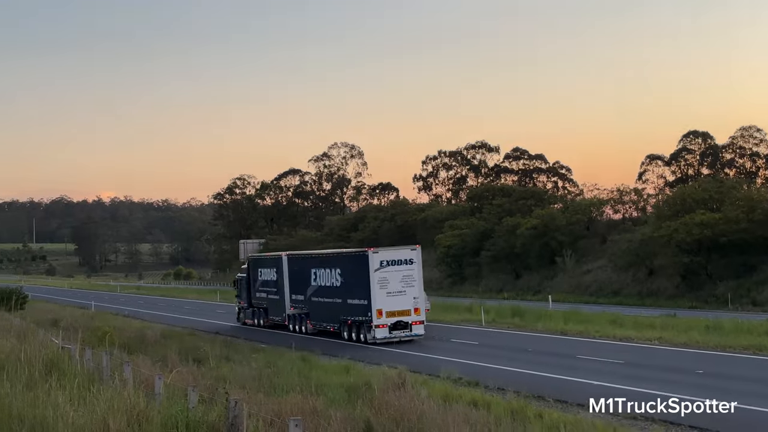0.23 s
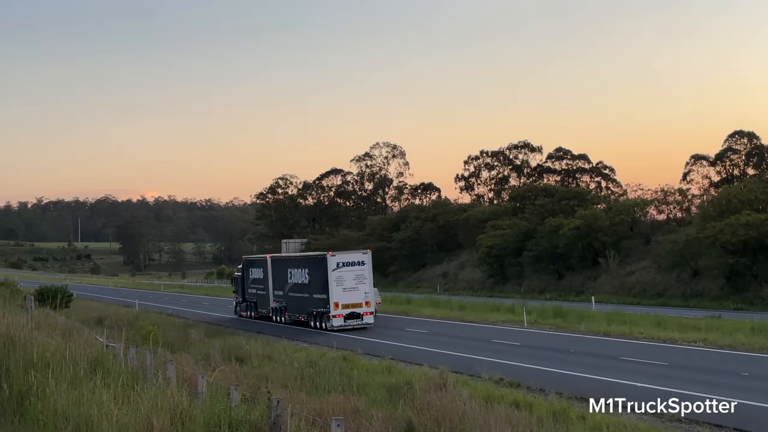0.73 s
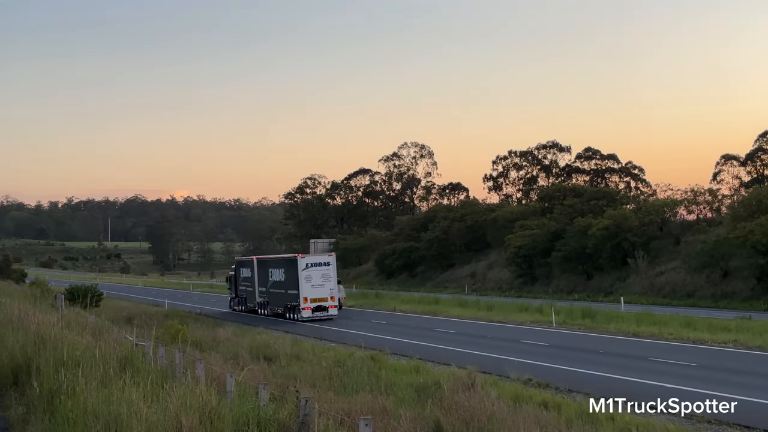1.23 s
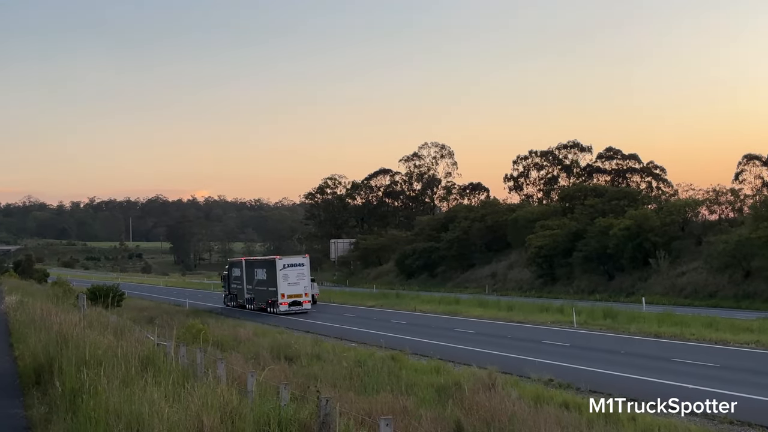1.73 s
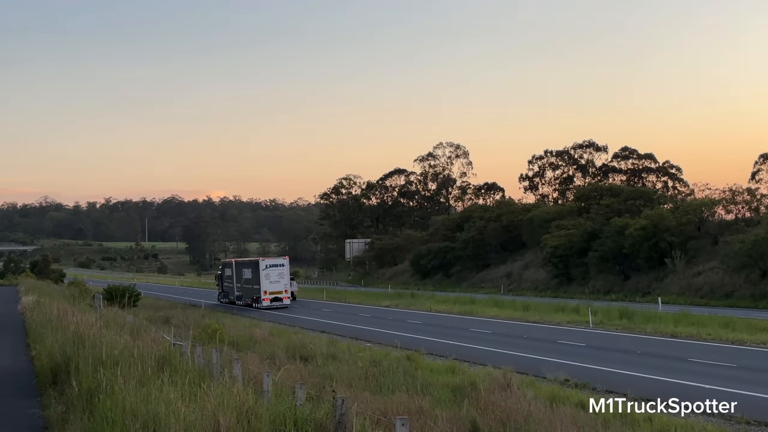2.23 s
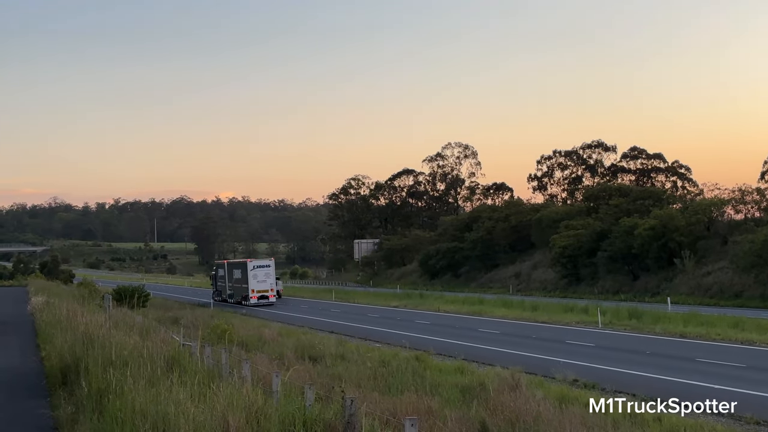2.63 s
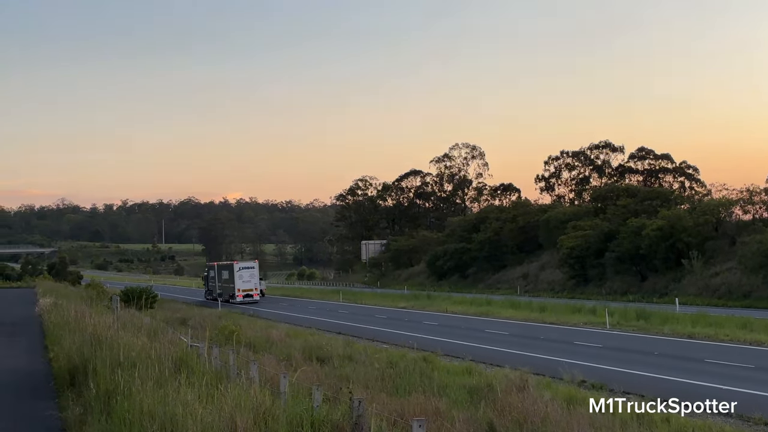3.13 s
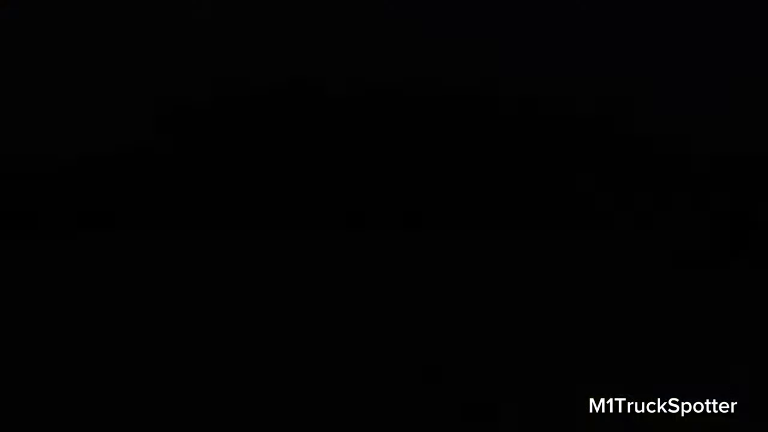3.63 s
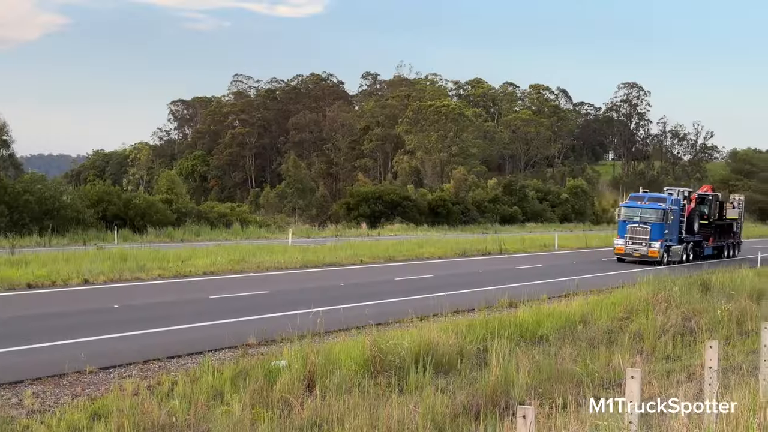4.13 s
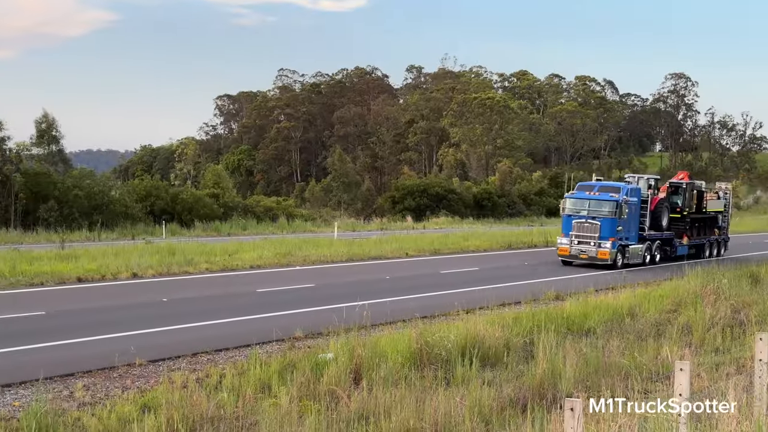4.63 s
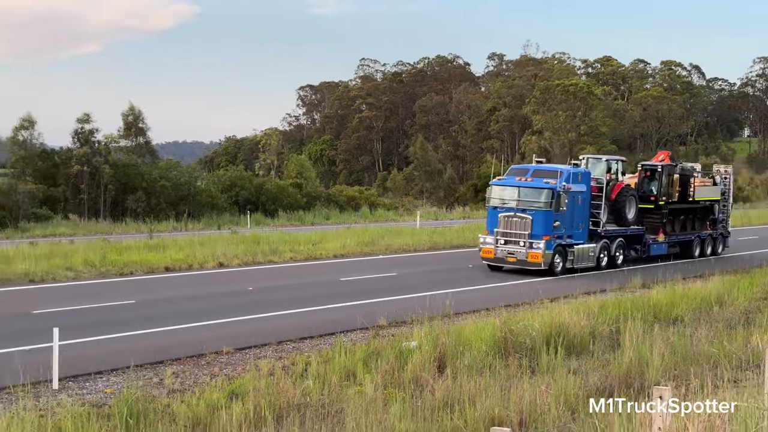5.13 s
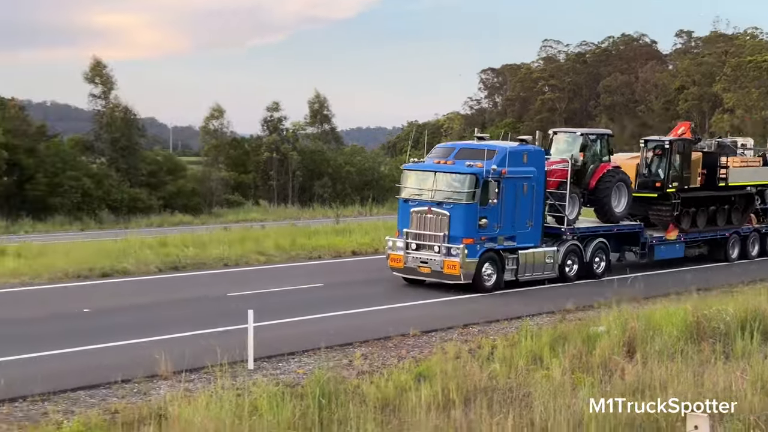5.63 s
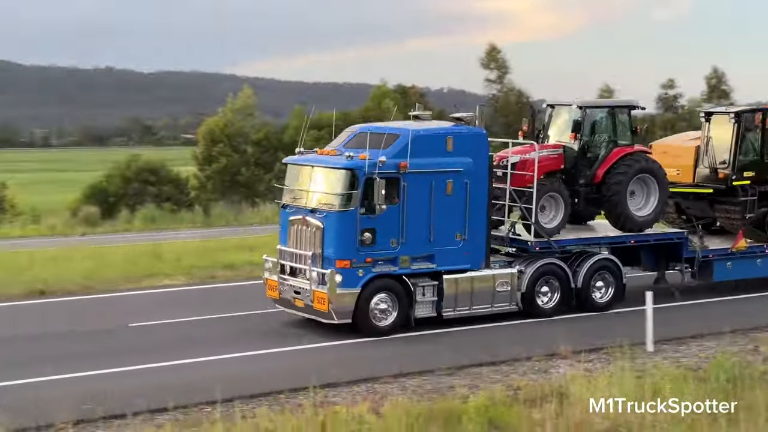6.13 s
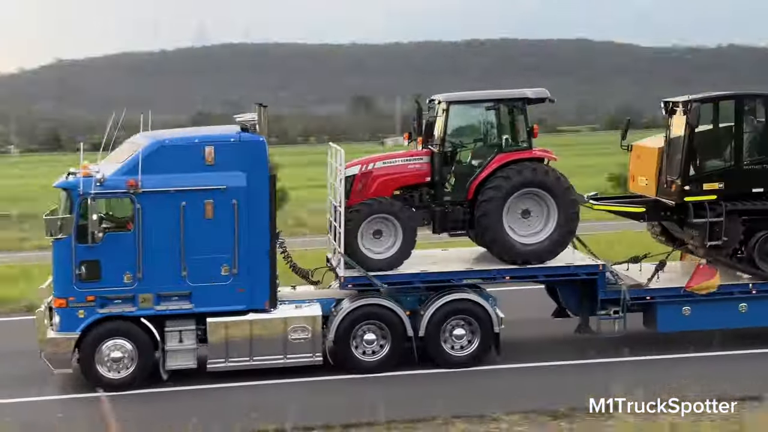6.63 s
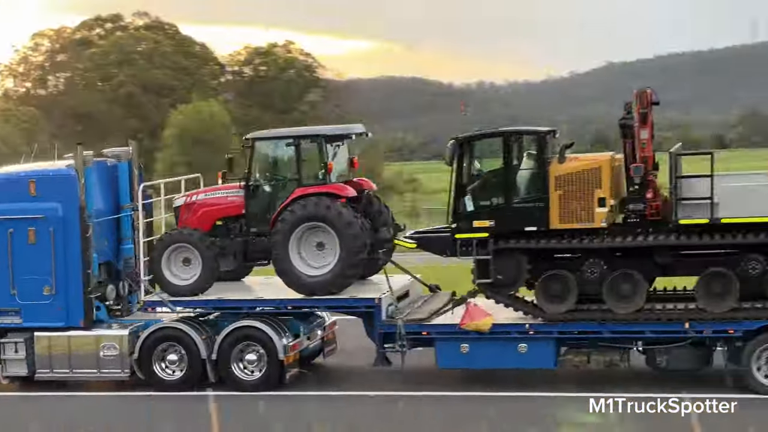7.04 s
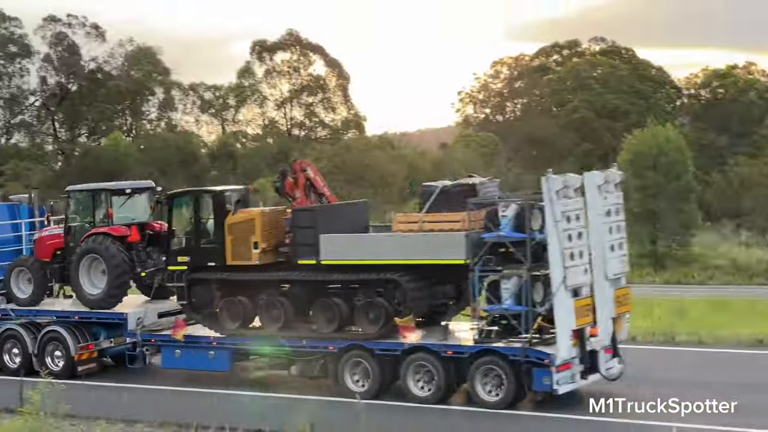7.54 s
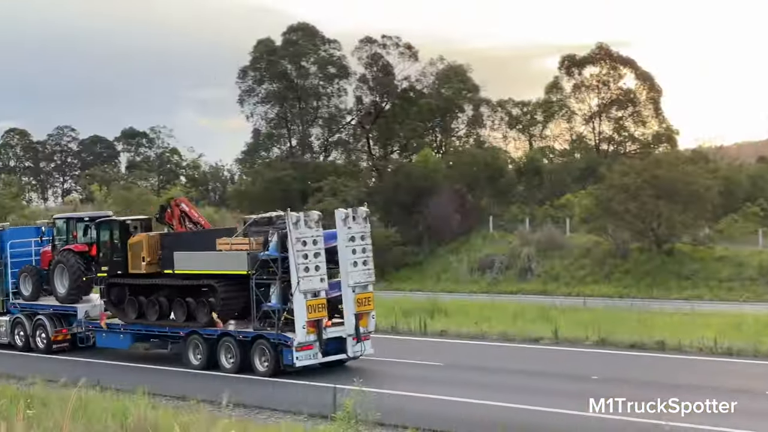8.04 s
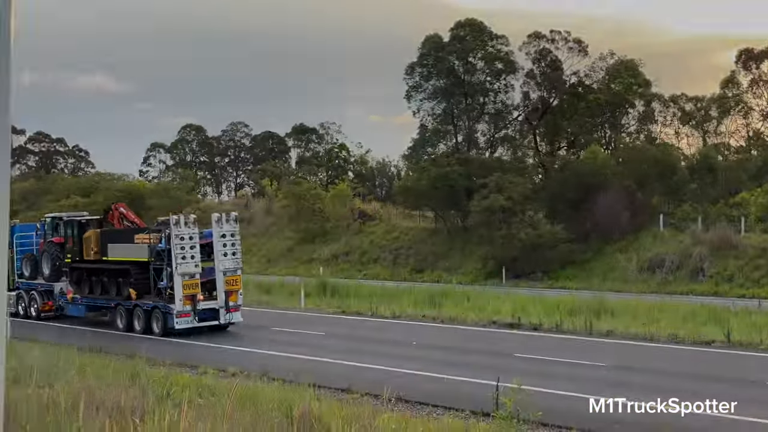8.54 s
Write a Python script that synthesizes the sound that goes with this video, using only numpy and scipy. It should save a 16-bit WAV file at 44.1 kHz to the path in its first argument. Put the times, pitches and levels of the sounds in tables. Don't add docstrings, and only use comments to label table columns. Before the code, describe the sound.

Receding muffled truck roar with faint insects, an abrupt double click, then a loud low diesel engine and singing tyres sweep past, chains rattling.

```python
import sys
import numpy as np
from scipy import signal
from scipy.fft import rfft, irfft, next_fast_len
from scipy.io import wavfile
from scipy.ndimage import uniform_filter1d, map_coordinates

SR = 44100
rng = np.random.default_rng(int(sys.argv[2]) if len(sys.argv) > 2 else 0)


def voltage_ratio(level):
    return 10 ** (np.asarray(level, float) / 20)


def persist_wave(psi):
    counts = np.round(np.clip(psi, -1, 1) * 32767).astype(np.int16)
    wavfile.write(sys.argv[1], SR, np.atleast_2d(counts).T)


N = 387330
CUT_S = 3.6627


def seconds():
    return np.arange(N) / SR


def unit(x):
    return x / np.sqrt(np.mean(x ** 2) + 1e-20)


def along(points, hz):
    f, v = np.transpose(points)
    return np.interp(np.log(hz + 1), np.log(f + 1), v)


def curves(rows):
    s, *columns = np.transpose(rows)
    return [np.interp(seconds(), s, column) for column in columns]


def bump(s, lasts):
    return np.exp(-.5 * ((seconds() - s) / lasts) ** 2)


def wobble(rate):
    knots = rng.standard_normal(int(N * rate / SR) + 4)
    return map_coordinates(knots, [np.arange(N) * rate / SR])


def filtered(x, response):
    m = next_fast_len(N + SR // 2)
    return irfft(rfft(x, m) * response(np.fft.rfftfreq(m, 1 / SR)), m)[..., :N]


def coloured(colour):
    return unit(filtered(rng.standard_normal(N), lambda f: voltage_ratio(along(colour, f))))


def narrow(hz, width):
    return unit(filtered(rng.standard_normal(N), lambda f: np.exp(-((f - hz) / width) ** 2)))


def swells(rows):
    return sum(voltage_ratio(db) * bump(s, lasts) * narrow(hz, width) for s, hz, width, db, lasts in rows)


def tone(hz, blur, flutter_db, free=1):
    turn = 2 * np.pi * (np.cumsum(hz) / SR + free * rng.random())
    level = np.sqrt(2) * voltage_ratio(flutter_db * wobble(9))
    return level * np.sin(turn + blur * wobble(12))


def crank(lag):
    true_hz, mach = 25.116, .0787
    abreast_s, reach_s = 6.767, .733
    u = (seconds() - lag - abreast_s) / reach_s
    return true_hz / (1 + mach * u / np.sqrt(1 + u * u))


def passing(hz, beam, echo, screened=0):
    db, behind_db, power = beam
    strength, detour, s, reach = echo
    u = (seconds() - s) / reach
    far = np.sqrt(1 + u * u)
    strength = np.clip(strength * (1 - screened * u / far), 0, 1)
    bounce = strength * np.exp(2j * np.pi * hz * detour / far / 343)
    return voltage_ratio(db + behind_db * u / far) * far ** -power * np.abs(1 + bounce)


EXHAUST = (3, 5, 6, 8, 9, 11)
# level abreast in dB, gain behind in dB, falloff power.
EXHAUST_BEAM = [(-12.5, -2.5, 0.95), (-24, -5.5, 0.82), (-27.5, -15, 0.62), (-19.5, -4.5, 4),
                (-25.5, -2.7, 2), (-26, -8.5, 2.46)]
# strength 0-1, detour abreast in m, nearest in seconds, reach in seconds.
EXHAUST_ECHO = [(0.79, 2.52, 6.79, 0.49), (0.75, 1.57, 6.45, 0.64), (1, 3.41, 7.31, 0.58),
                (0.82, 1.28, 6.83, 1.09), (0.67, 2.16, 6.49, 0.74), (0.86, 3.24, 6.82, 0.985)]
BLOCK_ORDERS = (12, 13, 14, 16, 19)
BLOCK_AIM = [(-35, -11.5, 2.5), (-34, -4, 1.9), (-28, -4, 2.6), (-40, -4.5, .7), (-35, -4.5, 1.35)]
BLOCK_BOUNCE = [(.85, 1.91, 6.91, 1.43), (.43, 2.67, 6.84, 1.32), (.88, .5, 6.72, .97),
                (.59, 2.3, 6.96, 1.27), (.46, 1.9, 6.37, .95)]
# multiple of the crank speed, level in dB. They share one aim and echo.
WEAK_ORDERS = [(2, -24), (4, 2.5), (7, -13), (8.5, -1.5), (10.5, -10), (15, -27), (18, -0.5)]
WEAK_AIM = (-43.5, -5.5, 1.37)
WEAK_BOUNCE = (0.31, 0.35, 6.1, 1.12)
# time in seconds, pitch in Hz, level in dB.
TURBO_WHINE = [(4, 10650, -88), (4.3, 10620, -77), (5, 10500, -71), (5.7, 10270, -68), (6.3, 9800, -67),
               (6.7, 9500, -100)]


def engine():
    hz = crank(0)
    out = 0
    for k, beam, echo in zip(EXHAUST, EXHAUST_BEAM, EXHAUST_ECHO):
        out += passing(k * hz, beam, echo, screened=0.31) * tone(k * hz, blur=.04, flutter_db=.3, free=0)
    for k, beam, echo in zip(BLOCK_ORDERS, BLOCK_AIM, BLOCK_BOUNCE):
        out += passing(k * hz, beam, echo) * tone(k * hz, blur=.1, flutter_db=1, free=0)
    weak = sum(voltage_ratio(db) * tone(k * hz, blur=.1, flutter_db=1, free=0) for k, db in WEAK_ORDERS)
    turbo_hz, turbo_db = curves(TURBO_WHINE)
    whine = voltage_ratio(turbo_db) * tone(turbo_hz, blur=2, flutter_db=5)
    return out + passing(12 * hz, WEAK_AIM, WEAK_BOUNCE) * weak + whine


# tractor level in dB, tractor nearest in seconds, trailer level in dB, falloff power.
ROAD_LAYERS = [(-21.5, 6.35, -45, 1.26), (-26.5, 6.03, -30.5, 1.82), (-38, 5.94, -42, 1.45),
               (-47, 6.4, -51, 2.03)]


def near_levels():
    trailer_s, reach_s = 7.33, .85

    def heard(db, s, power):
        return voltage_ratio(2 * db) * (1 + ((seconds() - s) / reach_s) ** 2) ** -power

    return [10 * np.log10(heard(tractor_db, s, power) + heard(trailer_db, trailer_s, power))
            for tractor_db, s, trailer_db, power in ROAD_LAYERS]


HANDOVER_HZ = [290, 2820, 6500], [837, 2850, 7450]


def road(levels, colours, place, split_hz, patchy_db):
    spectrum = signal.stft(rng.standard_normal(N), nperseg=512)[2]
    field = uniform_filter1d(rng.standard_normal(spectrum.shape), 4, 0)
    field = uniform_filter1d(field, 10, 1)
    noise = signal.istft(spectrum * voltage_ratio(patchy_db * unit(field)), nperseg=512)[1][:N]
    edges = [1, *split_hz, SR]
    out = 0
    for db, lo, hi in zip(levels, edges, edges[1:]):
        def share(f):
            return np.sqrt(1 / (1 + (f / hi) ** 6) - 1 / (1 + (f / lo) ** 6))

        for k, colour in enumerate(colours):
            weight = np.clip(1 - np.abs(place - k), 0, 1)
            layer = unit(filtered(noise, lambda f: share(f) * voltage_ratio(along(colour, f))))
            out = out + weight * voltage_ratio(db) * layer
    return out


# time in seconds, pitch in Hz, level in dB, length in seconds.
AXLE_SONGS = [(6.32, 568, -29, .13), (6.67, 582, -28.5, .13), (7.47, 875, -36, .13), (6.7, 835, -36, .07),
              (5.25, 616, -28, .17), (5.28, 573, -34, .15), (5.25, 899, -39, .25), (5.3, 990, -40, .22),
              (7.2, 446, -33, .14), (7.95, 538, -39, .3), (7.05, 555, -32, .15), (4.05, 617, -44, .3),
              (6.55, 476, -32, .13)]


def axles():
    hz = crank(.3)
    out = 0
    for s, pitch, db, lasts in AXLE_SONGS:
        glide = pitch * hz / np.interp(s, seconds(), hz)
        out += voltage_ratio(db) * bump(s, lasts) * tone(glide, blur=.6, flutter_db=2)
    return out


# multiple of the crank speed, lag behind the exhaust in seconds.
TREADS = [(18.24, .1), (36.48, .1), (54.72, .08), (22.68, .1), (33.18, -.05), (21.2, .2)]
# level abreast in dB, gain behind in dB, falloff power.
TREAD_AIM = [(-34, 9.5, 1.08), (-36, 0.5, 1.4), (-43.5, 2, 1.7), (-30.5, -2, 0.7), (-34, 1.5, 1.9),
             (-31, 3, 1.15)]
# strength 0-1, detour abreast in m, nearest in seconds, reach in seconds.
TREAD_BOUNCE = [(0.44, 1.48, 5.55, 0.71), (0.35, 1.285, 6.54, 0.73), (0.27, 0.67, 6.74, 1.45),
                (0.63, 1.374, 6.37, 0.52), (0.82, 1.04, 5.95, 0.74), (0.56, 0.83, 5.97, 0.36)]
# frequency in Hz, dB per Hz.
ROAR_COMING = [(40, -23), (100, 0.5), (190, 0), (250, -3), (330, -5.5), (480, -3.5), (750, -13.5),
               (1000, -11.5), (1850, -23), (2300, -26.5), (3600, -35.5), (4200, -40.5), (7500, -46.5),
               (15500, -56)]
ROAR_ABREAST = [(40, -17), (100, 0), (180, 4), (260, 4), (380, -4.5), (550, -1.5), (900, -9.5),
                (1400, -10.5), (2200, -19), (3300, -26), (5000, -30), (8000, -34.5), (12000, -40),
                (15500, -43)]
ROAR_LEAVING = [(40, -25), (100, 2.5), (170, -3), (250, -13.5), (350, -5.5), (550, -6), (900, -9.5),
                (1300, -8.5), (2000, -14.5), (3000, -21.5), (5000, -21.5), (8000, -28), (12000, -35.5),
                (15500, -37)]
# time in seconds, place (0 coming, 1 abreast, 2 leaving).
PASS_PLACE = [(4.6, 0), (6, 1), (7.3, 1), (8, 2)]


def tyres():
    out = axles()
    for (k, lag), beam, echo in zip(TREADS, TREAD_AIM, TREAD_BOUNCE):
        hz = k * crank(lag)
        out += passing(hz, beam, echo) * tone(hz, blur=.35, flutter_db=2)
    throb = 1 + 0.062 * np.sin(4 * np.pi * np.cumsum(crank(0)) / SR)
    colours = [ROAR_COMING, ROAR_ABREAST, ROAR_LEAVING]
    roar = road(near_levels(), colours, curves(PASS_PLACE)[0], HANDOVER_HZ[1], patchy_db=1.0)
    return out + throb * voltage_ratio(0.19 * wobble(8)) * roar


# time in seconds, peak level in dB, length in seconds.
CHAIN_SHAKES = [(5.72, -52, .01), (6.09, -51, .01), (6.53, -52, .01), (6.786, -38.5, 0.0099),
                (6.91, -44, .01), (7.094, -45, .015), (7.16, -43, 0.01), (7.49, -48, 0.014),
                (7.59, -49, .01), (7.68, -57, .01), (7.818, -50, .015), (8.11, -62, .01),
                (8.242, -55, .015), (8.52, -57, .03), (8.74, -60, .01)]
# frequency in Hz, level in dB.
STEEL = [(2000, -27), (4000, 2), (9000, 1), (15000, -9)]
# time in seconds, pitch in Hz, width in Hz, level in
# dB, length in seconds.
HIGH_ORDER_RINGS = [
    (7.45, 1040, 14, -37, .1),
    (7.75, 1010, 16, -35, .12),
]


def chains():
    shake = sum(voltage_ratio(db) * bump(s, length) for s, db, length in CHAIN_SHAKES)
    jingle = voltage_ratio(near_levels()[3] - 7 + 5 * wobble(45)) * (seconds() > 6.4)
    return (shake + jingle) * coloured(STEEL) + swells(HIGH_ORDER_RINGS)


# time in seconds, level in dB, length in seconds.
GUSTS = [
    (6.1, -33, 0.17),
    (6.4, -46, .1),
    (4.45, -57, .1),
    (7.4, -53, .1),
    (8.8, -44, .06),
]


def buffet():
    low = filtered(rng.standard_normal(N), lambda f: (f / 50) ** 2 * np.exp(-(f / 50) ** 2))
    breeze = voltage_ratio(-58)
    push = breeze + sum(voltage_ratio(db) * bump(s, lasts) for s, db, lasts in GUSTS)
    return push * unit(voltage_ratio(4.5 * wobble(12)) * low)


# time in seconds, level in dB.
FAR_ROAR = [(0, -31), (.5, -33), (1.2, -34.5), (1.9, -37), (2.4, -38), (2.8, -38), (3.25, -39.5),
            (3.65, -40.5)]
# dB over the roar at the start, dB lost per dB the roar loses.
FAR_FADES = [
    (-13, 0.73),
    (0.5, 1.07),
    (-15.5, 1.7),
    (-32, 5.5),
]


def far_levels():
    roar_db, = curves(FAR_ROAR)
    start_db = FAR_ROAR[0][1]
    return [start_db + db + grows * (roar_db - start_db) for db, grows in FAR_FADES]


# frequency in Hz, dB per Hz.
FAR_EARLY_COLOUR = [(40, -17), (65, -1.5), (135, 4), (230, -17), (400, -8), (700, -2), (950, -3.5),
                    (1300, -8), (2150, -14), (2600, -22), (4300, -21.5), (4800, -24), (10000, -26),
                    (15500, -40)]
FAR_LATE_COLOUR = [(24, -48), (40, -17), (63, 5.5), (197, -17.5), (351, -35), (385, -37), (702, -21),
                   (864, -1.5), (1310, -17), (1940, -19.5), (10000, -47), (13000, -87), (22000, -120)]
# pitch in Hz, level in dB, loudest in seconds, length in seconds, wander in radians.
FAR_SONGS = [(75, -48, 1.5, 3, 1.), (398, -42, .5, .45, .2), (398, -54, 2.6, .5, .4),
             (673, -37, .1, .25, .3), (675, -43, .68, .1, .4), (672, -46, 1.4, .3, .5)]
# time in seconds, pitch in Hz, width in Hz, level in dB, length in seconds.
FAR_BLURS = [(.8, 780, 10, -47, .8), (2.75, 860, 24, -43, .27), (2.3, 900, 16, -46, .3),
             (1, 1010, 16, -47, .6), (2.7, 950, 60, -44, .4)]


def far_truck():
    away = np.clip((seconds() - 1.2) / 5.8, 0, 1)
    colours = [FAR_EARLY_COLOUR, FAR_LATE_COLOUR]
    out = voltage_ratio(.7 * wobble(6.4)) * road(far_levels(), colours, away, HANDOVER_HZ[0], patchy_db=0.5)
    for hz, db, s, lasts, wander in FAR_SONGS:
        out += voltage_ratio(db) * bump(s, lasts) * tone(np.full(N, hz), wander, flutter_db=0.0)
    return out + swells(FAR_BLURS)


# time in seconds, level in dB.
CHORUS = [(0, -79), (2.5, -66), (3.64, -70), (3.7, -57), (4.1, -61), (5.2, -68), (5.5, -63)]
# time in seconds, pitch in Hz, width in Hz, level in dB, length in seconds.
LONE_CHIRPS = [
    (4.11, 3400, 60, -45, .009),
    (4.18, 13000, 250, -73, .12),
    (2.45, 9800, 90, -77, .25),
    (3.2, 9400, 150, -78, .3),
    (4.9, 9500, 250, -69, .4),
    (3.9, 9150, 150, -68, .2),
]


def insects():
    t = seconds()
    song = voltage_ratio(1.5 * wobble(60)) * np.where(t < CUT_S, narrow(8950, 520), narrow(9150, 260))
    db = np.where(t < 5.5, curves(CHORUS)[0], -80)
    unmasked = np.clip(t / 1.6, 0, 1) ** 2
    return unmasked * voltage_ratio(db - 3) * unit(song) + swells(LONE_CHIRPS)


# time in seconds, step in dB, relaxation in seconds.
CLICKS = [
    (3.6627, -16, .002),
    (3.6831, -12.5, .0012),
]


def scene():
    t = seconds()
    fade = np.clip((t - CUT_S) / 0.003, 0, 1)
    near_truck = engine() + tyres() + chains() + buffet()
    out = (t < CUT_S) * far_truck() + fade * near_truck + insects()
    for s, db, relax in CLICKS:
        out += voltage_ratio(db) * (t >= s) * np.exp(-np.abs(t - s) / relax)
    return out[None]


def low_pass(x):
    return signal.sosfilt(signal.butter(12, 15850, fs=SR, output="sos"), x)


# frequency in Hz, dB per Hz.
MIC_HISS = [(6000, -40), (9000, 0), (12000, 0), (15500, -5)]


def record(dry):
    t = seconds()
    x = filtered(dry + voltage_ratio(-82) * coloured(MIC_HISS), lambda f: f < 15740)
    # lower edge in Hz, first flicker in seconds, depth 0-1
    for edge_hz, start, depth in ((10000, 2.1, .6), (13000, 2.2, .6), (15000, 1, .95)):
        top = filtered(x, lambda f: 1 / (1 + (edge_hz / (f + 1)) ** 40))
        faint = np.clip(t - start, 0, 1 + depth) * (t < CUT_S)
        shut = uniform_filter1d(1. * (wobble(40) < 2 * faint * depth - 1.5), size=300)
        x = x - depth * shut * (faint > 0) * top
    mix = x / (1 + np.abs(x / .8) ** 4) ** (1 / 4)
    return low_pass(mix)


dry = scene()
out = record(dry)
persist_wave(out)
```